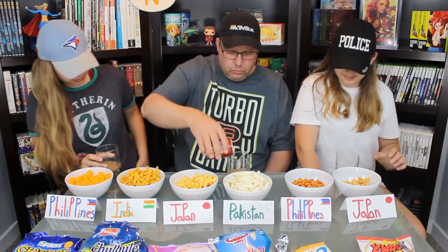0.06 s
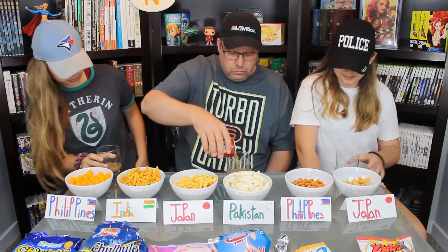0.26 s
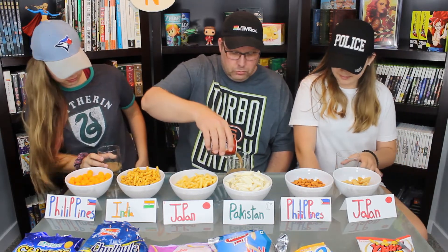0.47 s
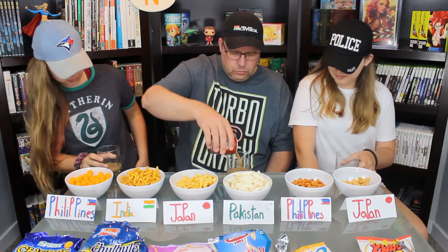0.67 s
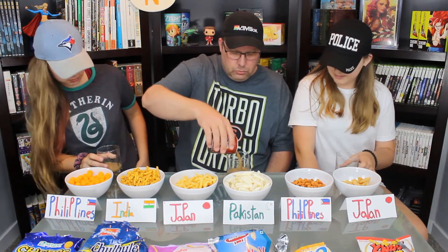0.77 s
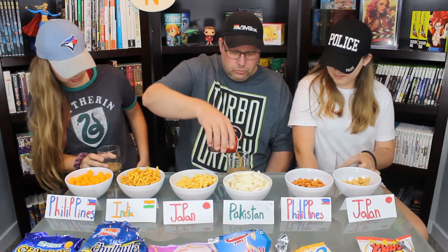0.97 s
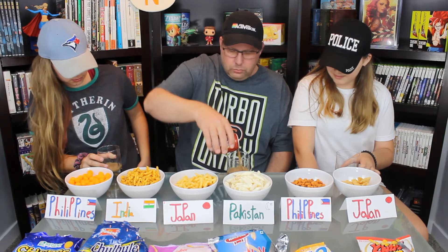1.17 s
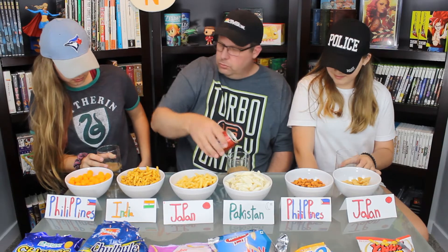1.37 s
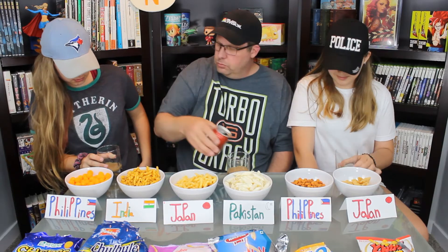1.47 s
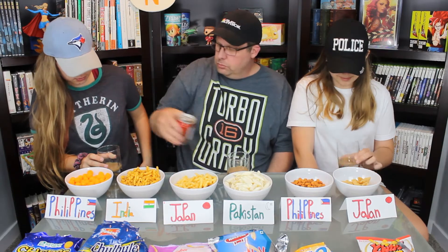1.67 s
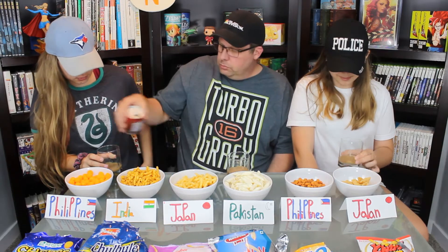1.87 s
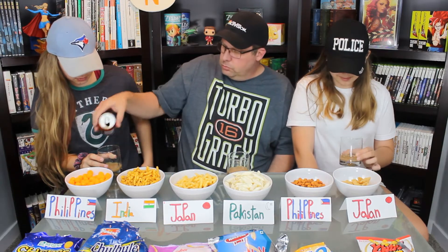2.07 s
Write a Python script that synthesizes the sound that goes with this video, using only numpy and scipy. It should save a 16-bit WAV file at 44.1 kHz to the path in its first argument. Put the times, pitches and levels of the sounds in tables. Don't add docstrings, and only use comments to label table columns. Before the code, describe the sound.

The last of a drink pours from a small can into a glass: faint trickle, one hollow glug, small bubbles and drips, then quick ticks and a bright clink on the rim, in a quiet furnished room.

```python
import sys
import numpy as np
from scipy import signal
from scipy.fft import rfft, irfft
from scipy.io import wavfile
from scipy.ndimage import uniform_filter1d

SR = 44100
rng = np.random.default_rng(int(sys.argv[2]) if len(sys.argv) > 2 else 0)


def to_linear_factor(level_db):
    exponent = np.asarray(level_db, float) / 20
    return 10 ** exponent


def unload_wav(signal):
    wavfile.write(
        sys.argv[1],
        SR,
        np.round(np.clip(np.atleast_2d(signal).T, -1, 1) * 32767).astype(np.int16),
    )


N = 92610


def level(x, db):
    return x * to_linear_factor(db) / np.sqrt(np.mean(x ** 2))


def fade(t, t60):
    return (t >= 0) * np.exp(-np.log(1000) * np.maximum(t, 0) / t60)


def band(x, hz, width):
    return signal.lfilter(*signal.iirpeak(hz, hz / width, fs=SR), x)


def high(x, hz):
    return signal.sosfilt(signal.butter(3, hz, "high", fs=SR, output="sos"), x)


def soft(x):
    return signal.sosfilt(signal.butter(3, 12800, fs=SR, output="sos"), x)


def colour(points):
    hz = np.maximum(np.arange(N // 2 + 1) * SR / N, 1)
    point_hz, point_db = np.array(points).T
    gain = to_linear_factor(np.interp(np.log(hz), np.log(point_hz), point_db)) * (hz > 20)
    return irfft(rfft(rng.standard_normal(N)) * gain, N)


def walk(rate):
    hold = int(SR / rate)
    steps = np.repeat(rng.standard_normal(N // hold + 1), hold)
    smooth = uniform_filter1d(steps, hold)[:N]
    return smooth / smooth.std()


def wobble(hz):
    depth_db = 2.5 * min(hz / 1800, 1) ** 2
    return to_linear_factor(depth_db * uniform_filter1d(walk(130), 100))


def struck(modes, blows):
    attack_s = 0.0003
    t, out = np.arange(SR // 2) / SR, 0
    for k, (hz, mode_db, t60) in enumerate(modes):
        ring = np.zeros(N + SR)
        tone = (-1) ** k * fade(t, t60) * np.sin(2 * np.pi * hz * t)
        for start, db, push in blows:
            at = int(start * SR)
            onset = 1 - np.exp(-t / (attack_s + push))
            gain = to_linear_factor(db + mode_db) / (1 + (hz * push) ** 2)
            ring[at:at + len(t)] += onset * gain * tone
        out = out + ring[:N] * wobble(hz)
    return out


def air_tones(table):
    t, out = np.arange(N) / SR, 0
    for start, length, hz, db, glide in table:
        u = np.clip((t - start) / length, 0, 1)
        swell = np.abs(np.sin(np.pi * u)) ** 0.55
        tone = np.sin(2 * np.pi * hz * length * u * (1 + glide * u / 2))
        out = out + to_linear_factor(db) * wobble(hz) * swell * tone
    return out


# pitch in Hz, level in dB per Hz.
FLOOR_SHAPE = [(15, -58), (25, -17.5), (53, -1), (157, -5), (384, -11.5), (489, -13.5), (1890, -24),
               (5880, -26), (16000, -27.5)]
# pitch in Hz, level in dB per Hz.
SIDE_HISS_SHAPE = [(15, -56.5), (25, -7.5), (190, -8), (624, -12), (775, -13.5), (840, -14), (1190, -15),
                   (14800, -13), (16000, -16.5)]


def room_floor():
    mid = colour(FLOOR_SHAPE)
    rumble = signal.sosfilt(signal.butter(2, 300, fs=SR, output="sos"), mid)
    flicker = to_linear_factor(2 * walk(25.44))
    mid = level(mid + rumble * (flicker - 1), -59.5)
    side = level(colour(SIDE_HISS_SHAPE), -68)
    return np.array([mid + side, mid - side])


def room(x):
    gap_s, early_s, late_db = 0.0027, 0.0214, -4.5
    t = np.arange(SR // 2) / SR
    noise = rng.standard_normal((2, len(t)))
    treble = high(noise, 4700)
    step = to_linear_factor(late_db * np.clip((t - early_s) / 0.0026, 0, 1))
    echoes = step * ((noise - treble) * fade(t - gap_s, 0.19) + treble * fade(t - gap_s, 0.21))
    sent = high(x, 565)
    mid, side = (signal.fftconvolve(sent, e / np.sqrt(np.sum(e ** 2)))[:N] for e in echoes)
    mid = x + to_linear_factor(0.5) * mid
    side = to_linear_factor(-52) * side
    return np.array([mid + side, mid - side])


# time in seconds, level in dB.
FLOW = [(0, -73.5), (.15, -74), (.25, -75), (.9, -90), (1.0, -64.5), (1.04, -71.5), (1.09, -66.5),
        (1.15, -77.5), (1.26, -66.5), (1.38, -62.5), (1.55, -96), (1.82, -96), (1.86, -81), (2.0, -84),
        (2.1, -88)]
# pitch in Hz, width in Hz, level in dB.
GLASS_HUM = [(3740, 50, -72), (5210, 100, -81), (6200, 1300, -76), (3050, 160, -82.5), (4620, 660, -77.5)]


def trickle():
    count, middle_hz, pitch_spread, cycles, scatter_db = 2500, 3100, 0.25, 4, 1.5
    hum_from_s, hum_rise_s = 1.82, 0.06
    t, u = np.arange(N) / SR, np.arange(1024) / SR
    starts = rng.integers(0, N, count)
    sizes = rng.standard_exponential(count)
    pitches = middle_hz * np.exp(pitch_spread * rng.standard_normal(count))
    bubbles = np.zeros(N + 1024)
    for at, size, hz in zip(starts, sizes, pitches):
        ring = np.exp(-u * hz / cycles) * np.sin(2 * np.pi * hz * u)
        bubbles[at:at + 1024] += to_linear_factor(scatter_db * size) * np.sqrt(hz) * ring
    flow = to_linear_factor(np.interp(t, *np.array(FLOW).T))
    hum = 0
    for hz, width, db in GLASS_HUM:
        hum = hum + level(band(rng.standard_normal(N), hz, width), db) * to_linear_factor(2.5 * walk(40))
    return level(bubbles[:N], 0) * flow + hum * np.clip((t - hum_from_s) / hum_rise_s, 0, 1)


# start in seconds, level in dB, middle pitch in Hz, fade time (60 dB) in seconds.
SPLASHES = [(0.2353, -49, 3650, 0.094), (0.327, -56, 1460, 0.2), (.338, -63, 5820, 0.046),
            (.445, -61.5, 1270, .08), (.597, -63.5, 2550, 0.21), (0.644, -61, 6300, 0.08),
            (1.262, -59, 6000, 0.078), (1.384, -50, 8500, 0.06), (1.379, -55.5, 3540, 0.14),
            (1.4208, -42, 2740, 0.095), (1.4217, -46, 8000, 0.072), (1.456, -48, 3750, 0.098),
            (1.262, -62, 10800, .04), (1.263, -56, 3600, .06), (1.4225, -42, 1450, .12),
            (.236, -50, 1500, .1), (.3, -56, 1150, .2), (1.424, -51, 3600, .1), (.97, -66, 2800, .5),
            (.46, -62, 1000, .3)]


def splashes():
    t, out = np.arange(N) / SR, 0
    for start, db, hz, t60 in SPLASHES:
        spray = band(band(rng.standard_normal(N), hz, hz), hz, hz)
        out = out + level(spray, db) * fade(t - start, t60)
    return out


# start in seconds, pitch in Hz, level in dB, fade time (60 dB) in seconds.
DROPS = [(.33, 1950, -56, .04), (0.337, 2840, -56, 0.043), (0.344, 5830, -44.5, .01),
         (.359, 3840, -42, 0.015), (.483, 710, -50, 0.033), (.519, 740, -55, 0.044),
         (0.496, 1080, -49, 0.042), (0.509, 1560, -57.5, 0.032), (.54, 1946, -58, 0.038),
         (.552, 1055, -51.5, 0.033), (0.6, 2570, -58, .04), (.61, 7160, -54, 0.016),
         (.646, 5404, -33.5, 0.023), (.496, 780, -52, .03), (.679, 5330, -43, 0.029),
         (0.668, 1023, -44, 0.027), (.685, 1940, -49, 0.04), (.718, 3150, -47.5, 0.028),
         (.939, 2850, -57.5, .03), (1.096, 2000, -68, .05), (1.211, 2100, -56.5, .03),
         (1.262, 3435, -37.5, 0.024), (1.264, 2120, -56, 0.03), (1.264, 4500, -46, 0.015),
         (1.268, 3440, -39, .02), (1.231, 3430, -56, 0.042), (1.305, 3400, -48.5, 0.033),
         (1.362, 1130, -47, 0.038), (1.36, 4200, -47, 0.017)]


def drops():
    rise_per_s, attack_s = 0.5, 0.0015
    t, out = np.arange(N) / SR, 0
    for start, hz, db, t60 in DROPS:
        u = np.maximum(t - start, 0)
        swell = fade(t - start, t60) * (1 - np.exp(-u / attack_s))
        tone = np.sin(2 * np.pi * hz * u * (1 + rise_per_s * np.minimum(u, t60)))
        out = out + to_linear_factor(db) * swell * tone
    return out


# start in seconds, length in seconds, pitch in Hz,
# level in dB, glide as a share of the pitch.
POCKETS = [(1.38, 0.019, 1190, -38.5, -0.113), (1.403, .018, 1130, -37, -0.03),
           (1.383, .012, 1900, -47, .09), (1.397, 0.019, 2130, -45, 0.0085), (1.378, 0.042, 2880, -48, .02),
           (1.393, 0.0264, 1755, -48, 0.00018), (1.379, 0.0044, 5850, -38.5, -0.028),
           (1.4225, .02, 1100, -26, -.12), (1.4425, .009, 1060, -28, 0.019),
           (1.460, .014, 1030, -32, 0.022), (1.484, .014, 1055, -48, -0.044),
           (1.4215, .012, 2880, -27, 0.013), (1.434, .014, 2905, -32, .015), (1.451, .011, 2895, -42, .005),
           (1.432, 0.018, 1460, -32.5, -0.024), (1.421, 0.032, 1732, -37, -0.014),
           (1.425, 0.01, 4200, -40, 0.013), (1.468, 0.0083, 4190, -49.5, -0.016),
           (1.488, 0.015, 1420, -49, -.01), (1.359, .008, 5100, -54, 0.0025),
           (1.088, 0.019, 1950, -55, .012), (.444, 0.0135, 789, -42, 0.19), (.459, 0.015, 775, -48, 0.045),
           (.442, 0.015, 1700, -58, .03), (.456, .024, 1620, -60, -.01), (0.35, 0.017, 1026, -57, .05)]


def pockets():
    return air_tones(POCKETS)


# pitch in Hz, level in dB, fade time (60 dB) in seconds.
TICK_TONES = [(2150, -14, .03), (4480, -18, 0.025), (5960, -7, 0.022), (6360, -2, 0.031), (6566, 1, 0.044),
              (6840, -1, .03), (7140, -13, .02), (8380, -14, .02), (9800, -16, .025), (10750, -7, .025),
              (11000, -12, .02), (11740, -13, .025), (12135, -12, .025), (13150, -6, .02)]
# start in seconds, level in dB, push length in seconds.
TICKS = [
    (1.3843, -35.5, .00003),
    (1.3868, -37, .00003),
    (1.3885, -35.5, .00002),
    (1.39, -36, .00005),
    (1.394, -42, .00005),
    (1.4028, -39, 0.000062),
    (1.409, -43, .00007),
    (1.415, -44, 0.000076),
]


def ticks():
    return struck(TICK_TONES, TICKS)


# pitch in Hz, level in dB, fade time (60 dB) in seconds.
CLINK_TONES = [(1200, -8.5, 0.057), (1400, -6.5, .07), (1545, -7, .07), (2210, -11.5, .05),
               (2443, -17, 0.053), (3255, -5.5, 0.066), (4030, -14.5, 0.076), (4390, -13, 0.063),
               (5220, -12.5, 0.046), (5879, -3.5, .05), (6170, -11.5, .06), (8300, -12.5, .02),
               (9870, -6, 0.033), (11700, -10.5, 0.023)]
# start in seconds, level in dB, push length in seconds.
CLINKS = [
    (1.4218, -27.5, 0.00002),
    (1.4275, -38, 0.0001),
    (1.436, -39, 0.0001),
    (1.444, -42, 0.00022),
    (1.47, -48, .0001),
]


def clinks():
    return struck(CLINK_TONES, CLINKS)


def crack():
    burst = band(high(rng.standard_normal(N), 4600), 9300, 4200)
    return to_linear_factor(-28) * burst * fade(np.arange(N) / SR - 1.4218, 0.0048)


# start in seconds, length in seconds, pitch in Hz,
# level in dB, glide as a share of the pitch.
BURBLES = [(.2333, .0316, 404, -15.1, -.004), (.268, .0155, 427.4, -23.8, .02),
           (.287, .015, 435, -31.5, -0.046), (.305, .018, 419, -33.5, -0.029),
           (.254, 0.013, 887, -37, 0.054), (0.29, 0.025, 1535, -48.5, 0.0079),
           (0.313, .01, 1090, -46, -.03), (.322, .011, 1074, -47, .14), (.339, .016, 1170, -51, -.04),
           (.318, .014, 1480, -54, .01), (.355, .014, 880, -55, 0.014)]


def burbles():
    return air_tones(BURBLES)


# pitch in Hz, level in dB, fade time (60 dB) in seconds.
CAN_TONES = [(278, -21, .2), (393.3, -10.9, .245), (479.9, -7.5, .28), (558, -19, .25), (652.5, -19.5, .17),
             (806, -19.5, .13), (933.5, -26, .15), (1090, -35, .15), (1318, -27.5, 0.12), (1930, -27, .14),
             (2420, -28, .2), (3515, -22.5, 0.091), (3665, -25, .15), (6980, -32, 0.087)]
# pitch in Hz, level in dB, fade time (60 dB) in seconds.
TABLE_TONES = [(130.7, -33, 0.45), (191.5, -38, 0.23)]
# start in seconds, level in dB, push length in seconds.
GULPS = [
    (0.212, -47.5, 0.00062),
    (.2336, -14.0, .00024),
    (.2511, -15.7, .0010),
]


def glug():
    closes_s, closed_db = 0.2620, -3.0
    shut_s, shut_db_per_s = 0.319, -300
    t = np.arange(N) / SR
    muffle_db = closed_db * np.clip((t - closes_s) / 0.0016, 0, 1)
    shut_db = shut_db_per_s * np.maximum(t - shut_s, 0)
    can = struck(CAN_TONES, GULPS) * to_linear_factor(muffle_db + shut_db)
    return high(can + struck(TABLE_TONES, GULPS), 111)


def scene():
    air = high(high(pockets() + burbles(), 300), 300)
    rim = soft(high(clinks() + ticks(), 790))
    near = air + glug() + rim
    wet = soft(crack() + high(drops() + splashes(), 450)) + trickle()
    share = to_linear_factor(-10)
    return room_floor() + room(wet + share * near) + (1 - share) * near


def top_cut(x):
    return signal.sosfilt(signal.butter(12, 16640, fs=SR, output="sos"), x)


def record(dry):
    mix = signal.sosfilt(signal.ellip(8, 0.2, 60, 15850, fs=SR, output="sos"), dry)
    return top_cut(mix)


dry = scene()
out = record(dry)
unload_wav(out)
```